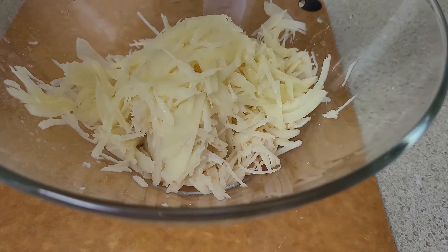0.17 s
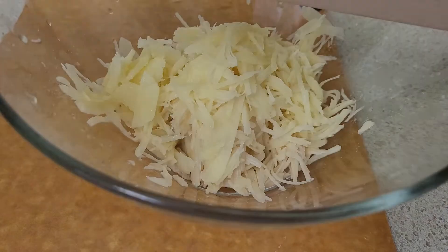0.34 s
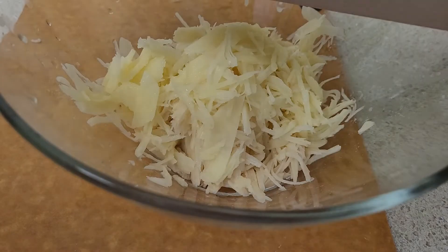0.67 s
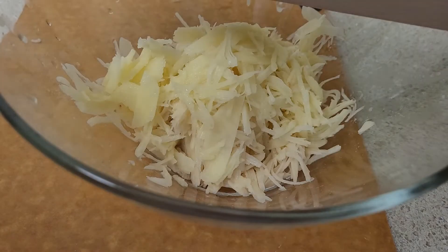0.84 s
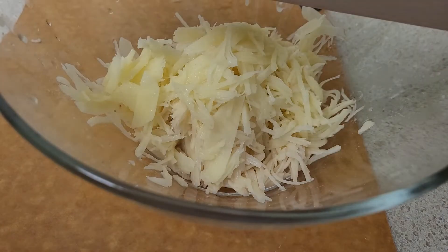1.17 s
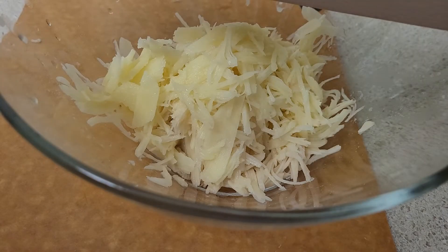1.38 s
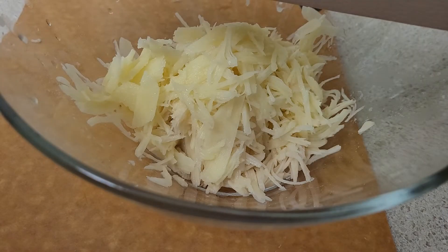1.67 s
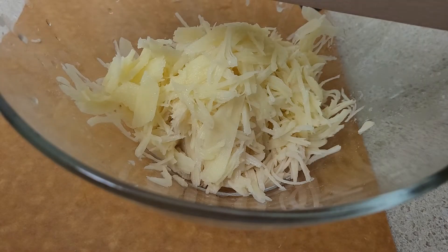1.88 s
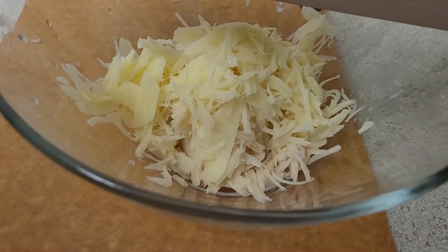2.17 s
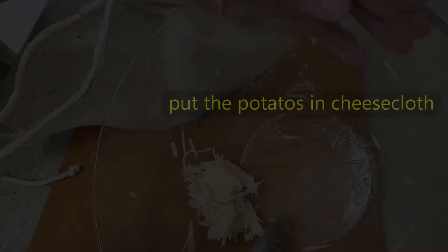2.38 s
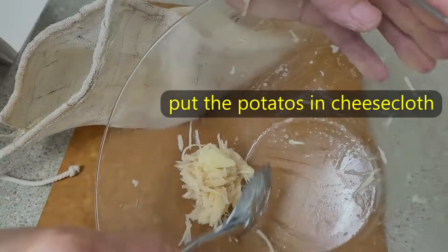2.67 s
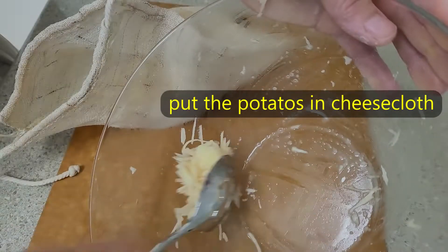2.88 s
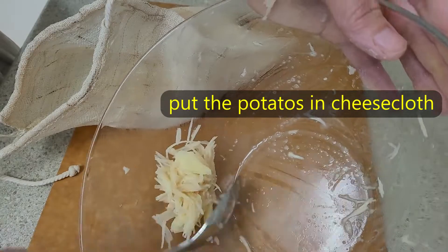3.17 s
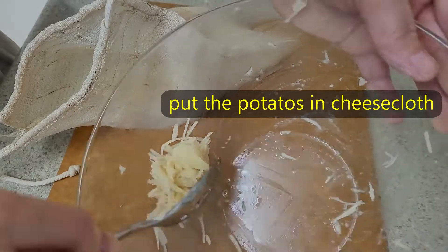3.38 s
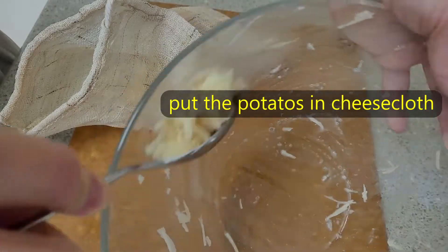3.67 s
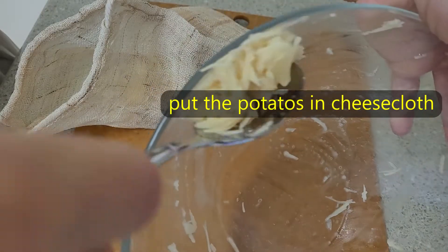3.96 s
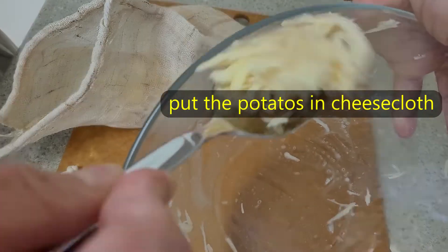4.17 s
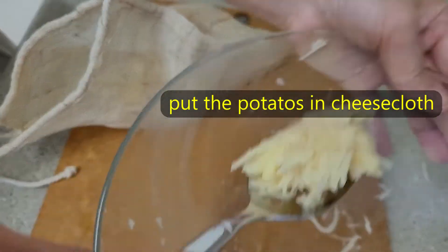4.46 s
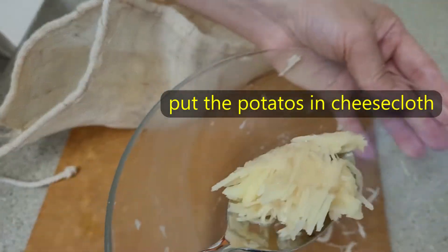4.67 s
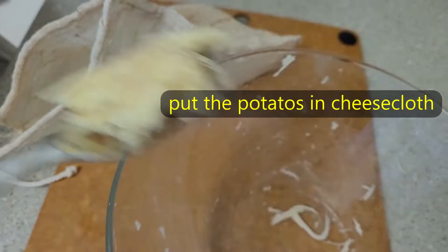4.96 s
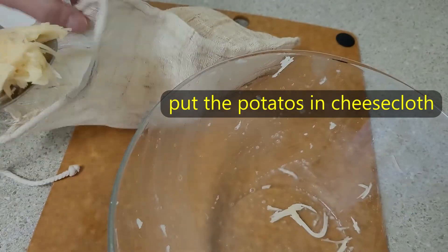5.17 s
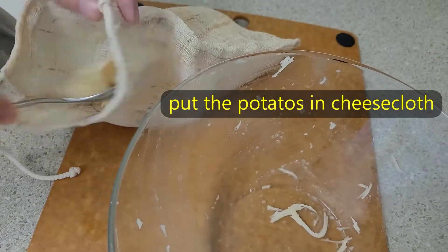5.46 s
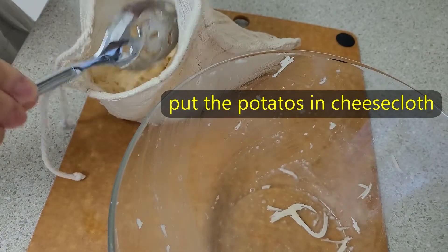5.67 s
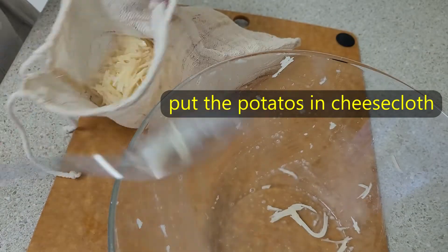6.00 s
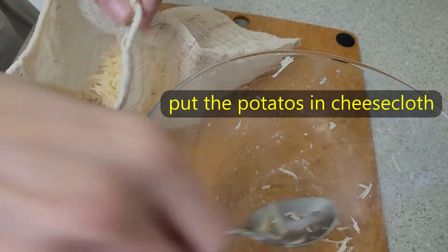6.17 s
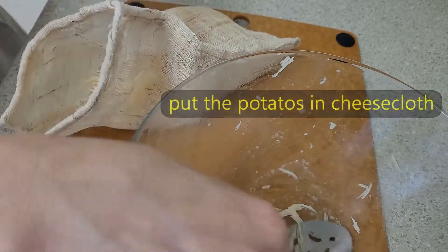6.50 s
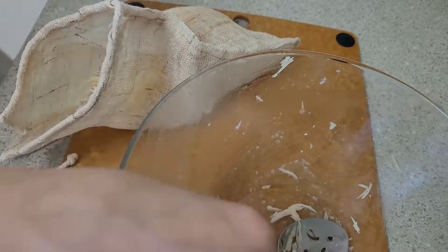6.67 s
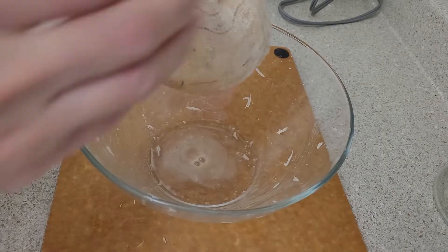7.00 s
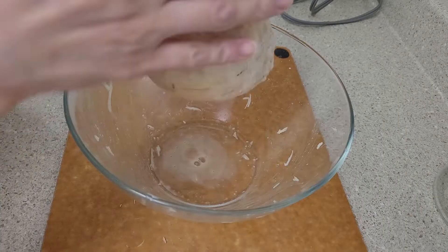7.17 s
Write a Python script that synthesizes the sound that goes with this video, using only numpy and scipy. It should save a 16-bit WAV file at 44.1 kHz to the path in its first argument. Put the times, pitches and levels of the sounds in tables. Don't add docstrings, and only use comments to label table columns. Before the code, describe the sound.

Quick wet shredding rasps stop abruptly, near quiet follows, then a spoon taps glass, a bowl thuds down, wet fizz and metal clatter.

```python
import sys
import numpy as np
from scipy import signal
from scipy.fft import rfft, irfft
from scipy.io import wavfile
from scipy.ndimage import uniform_filter1d

SR = 44100
rng = np.random.default_rng(int(sys.argv[2]) if len(sys.argv) > 2 else 0)


def to_wav(sig):
    pcm = np.clip(np.atleast_2d(sig), -1, 1) * 32767
    pcm = np.round(pcm).astype(np.int16)
    wavfile.write(sys.argv[1], SR, pcm.T)


def invert_db(level):
    return 10 ** (np.asarray(level, dtype=float) / 20)


N = 323694
TIME = np.arange(N) / SR

CUTS_S = [
    .302,
    2.168,
    2.302,
    6.72,
]

# centre in seconds, peak level in dB, length in seconds.
STROKES = [
    (.004, -29, 0.033),
    (0.05, -29.5, 0.031),
    (.095, -23, 0.034),
    (0.148, -27.5, 0.028),
    (0.18, -31.5, 0.019),
    (0.193, -23, 0.031),
    (0.207, -24.5, 0.025),
    (0.222, -24, 0.03),
    (0.272, -27, 0.032),
]
# frequency in Hz, density in dB per Hz.
BLADE_COLOUR = [(180, -64.5), (300, -29.5), (398, -20.5), (439, -25.5), (633, -0.5), (747, -18.5),
                (1170, -11), (2160, -8), (3160, -5), (7600, -12.5), (12500, -10.5), (15800, -17.5)]
# frequency in Hz, level in dB.
SLICER_ECHO = [(3500, 3), (5500, -25)]
SLICER_WET = 0.61

# frequency in Hz, density in dB per Hz.
STILL_AIR = [(15, -54.5), (25, -26), (82, -5), (189, -14), (228, -1), (276, -19), (352, -5), (486, -13.5),
             (636, -17), (1350, -24.5), (1920, -31.5), (2090, -41.5), (2260, -22), (2730, -33),
             (15800, -52.5)]
BUSY_AIR = [(15, -41.5), (25, 1), (165, -9), (228, 0.5), (342, -4.5), (556, -1.5), (1150, -16.5),
            (1320, -14.5), (1640, -27), (2320, -21), (3580, -29), (6300, -36), (15800, -59.5)]
LAST_AIR = [(15, -36), (25, -10.5), (59, -5.5), (152, -7), (228, 4.5), (316, -8), (371, 0.5), (748, 2),
            (1010, -9), (1870, -12.5), (4090, -26), (10200, -36), (15800, -69)]
STILL_DB, BUSY_DB, LAST_DB = -56, -49, -49.5
# frequency in Hz, width in Hz, level in dB.
FAN_BANDS = [(1926, 59, -3), (2280, 110, -7), (8640, 64, -16)]
# frequency in Hz, difference in dB.
PORTS_DB = [(60, -5.5), (110, -2), (200, -7.5), (380, 2.5), (700, -1), (1290, 0), (2380, 0.5), (4400, -2),
            (8120, -0.5), (15000, 0.5)]
ROOM_T60_S, ROOM_TOP_T60_S, ROOM_DB = 0.27, 0.2, -19

# start in seconds, then crack, bowl, neck and rim levels in dB.
TAPS = [
    (2.6678, -8, -2.5, -16.5, -26),
    (2.7573, -12.5, -13.5, 1.5, -21),
    (2.79, -30, -1, -5, -9.5),
    (2.829, -31, -5.5, -14, -5),
    (2.8466, -6.5, -10.5, -30.5, -26),
    (3.1242, -9, -6, -12, -17.5),
    (3.164, -31, -7, -3.5, -6.5),
    (3.189, -2.5, -4.5, -8.5, -14.5),
    (3.4629, -14.5, -2, -32.5, -36),
]
# start in seconds, level in dB.
CHIMES = [
    (2.302, -57.5),
    (2.418, -65.5),
    (2.456, -50),
]
CHIME_MODE = (3982, 0, 0.37)
# frequency in Hz, level in dB, 60 dB decay in seconds.
BOWL = [(600, -11, 0.09), (1200, -16.5, .07), (1223, -15, 0.21), (1333, -12, 0.15), (1478, -13, 0.11),
        (1720, -26, .15), (2430, -4.5, 0.08), (2930, -11.5, 0.32), (3290, -7, 0.098)]
NECK = [(3940, -23, 0.3), (4090, 8.5, 0.26)]
RIM = [(5340, -18, 0.15), (6510, 1, .22), (7154, -15, 0.12), (8370, -14, .15), (8852, -24, .12),
       (10280, -14.5, .17), (11440, -21, 0.15), (12100, -25, .12), (12935, -20, 0.13), (13350, -23.5, 0.11)]
# frequency in Hz, density in dB per Hz.
CRACK_COLOUR = [(120, -29), (200, -24), (802, -2.5), (1470, 0), (2490, -29.5), (2830, -4.5), (6560, -15.5),
                (15800, -54)]
CLATTER_COLOUR = [(180, -51), (300, -31.5), (1680, -7.5), (2340, -9), (4400, -12), (4620, -9.5),
                  (6340, -10.5), (15800, -16.5)]
REGRIP_S, GRIP_HZ = 3., (4010, 3979)
GRIP_RING = (0.81, 0.87)
TOUCH_DAMPS_DB_S = 900

# start in seconds, peak level in dB, upper modes in dB.
THUDS = [(1.011, -61, 14), (2.454, -45.5, 7.5), (2.667, -29, 5.5), (2.758, -36.5, 13.5), (2.845, -23.5, -1),
         (3.123, -34, 8), (3.188, -23, 6), (4.7222, -2, -4.5), (4.978, -49, 6), (5.045, -37, -9),
         (5.878, -40, -13), (5.919, -62, -15), (6.392, -26, -5.5), (6.552, -25.5, -0.5)]
# frequency in Hz, level in dB, 60 dB decay in seconds.
BOARD = [(55.4, -12, 0.35), (93.2, -11, 0.33), (118.9, -4, 0.23), (207.2, -18.5, .2), (331.3, -5, 0.26)]
FOOT = [(322.4, -2.5, 0.052), (475.6, -8.5, 0.023), (630.4, 7, 0.063), (727, -3, 0.066), (1212, -8.5, 0.17),
        (1735, -15.5, 0.015), (2130, -24, 0.069), (3340, -20, 0.038)]
SET_DOWN = [(187.3, -6, 0.18), (341, -5.5, 0.14), (409.5, -4, 0.13), (538, -8, 0.16), (752, -14, 0.16),
            (1058, -16, 0.105), (1178, -6.5, 0.077), (1434, -17.5, .12), (1733, -10.5, 0.057),
            (2150, -17.5, .07), (2560, -26, .07), (3302, -24, .05)]
HUM_S, HUM_MODE = 4.735, (426, -30.5, 1.02)

# start in seconds, peak level in dB, rattle decay in seconds,
# landing end (0 handle, 1 scoop), clatter level in dB.
DROPS = [
    (6.3881, -6.5, 0.0028, 0, -6.5),
    (6.3966, -3.5, 0.0056, 0, -10.5),
    (6.4033, -12.5, 0.0055, 0, -8.5),
    (6.4342, -29.5, 0.015, 1, -4),
    (6.5452, -16, .0062, 1, -3),
    (6.5522, 5, 0.017, 1, -4.5),
    (6.5634, -2, 0.023, 1, -3.5),
    (6.5785, -8, .021, 1, -8.5),
    (6.6145, -20, 0.076, 1, -2),
]
# frequency in Hz, level in dB, 60 dB decay in seconds.
HANDLE = [(394, -18, .2), (549, -24, .2), (1276, -14, .13), (2310, -16, .07), (3235, -10, .09),
          (3652, -20, .05), (4030, -14, .1), (5490, -13, .11), (6175, -12, .1), (7030, -21, .1),
          (8680, -4, .09), (8893, -1, .1), (9240, -13, .075), (10335, -13, .07), (11255, -13, .08),
          (12095, -14, .09), (13115, -11, .07), (15310, -13, .055)]
SCOOP = [(1502, -20, .1), (2322, -4, .14), (3258, -11, .26), (4002, -13, .1), (4324, -11, .28),
         (5165, -19, .13), (5549, -15, .3), (6218, -5, .13), (6526, -14, .22), (6840, -12, .22),
         (7470, -13, .2), (8177, -11, .22), (8893, -10, .2), (9275, -8, .12), (10124, -13, .23),
         (10562, -21, .14), (11082, -21, .22), (11742, -17, .16), (12072, -17, .2), (12567, -14, .15),
         (12902, -16, .14), (13471, -14, .16), (14002, -18, .1), (15305, -17, .09)]

# time in seconds, level in dB.
DRAG = [(2.3, -50.5), (2.73, -62.5), (2.85, -53.5), (3.18, -58), (3.35, -47.5), (3.88, -50.5), (4.12, -58),
        (4.4, -49.5), (5.12, -56), (6.22, -60), (7.34, -58)]
# frequency in Hz, density in dB per Hz.
SHREDS_COLOUR = [(590, -21), (1000, -0.5), (1120, -6.5), (1350, 3.5), (1550, -2), (2240, -4), (2890, -6.5),
                 (3400, -2.5), (4430, -5), (12700, -2), (15800, -9.5)]
FIZZ_FULL_S, FIZZ_DB, FIZZ_RISE_DB_S = 4.665, -52, 99.5
FIZZ_DRAINS_S, FIZZ_DRAIN_DB_S, FIZZ_ENDS_S, FIZZ_END_DB_S = 5.44, 8, 6.55, 121

HAUL_S, HAUL_RISE_S, HAUL_FALL_S, HAUL_DB = 4.385, 0.091, 0.15, -31.5
SLIP_HZ, SLIP_WOBBLE, SLIP_PATCHY_DB = 108, .03, 4
HAUL_PAUSE_S = 4.44
SLIP_ORDERS_DB = [3, -8, -8, -14.5, -25]
HAUL_HISS_S, HAUL_HISS_DB, HAUL_HISS_HZ = (4.35, 4.57), -46, 1560

# start in seconds, peak level in dB, decay in seconds.
TICKS = [
    (1.468, -43, 0.0068),
    (2.4155, -48.5, 0.0038),
    (3.464, -23.5, 0.018),
    (3.797, -51, 0.0065),
    (4.723, -26, 0.0576),
    (5.177, -34.5, 0.066),
    (6.829, -52, 0.0058),
    (7.01, -49, .005),
]
# centre in seconds, peak level in dB, length in seconds,
# centre frequency in Hz.
BRUSHES = [(.477, -64, .05, 2700), (.783, -56, .07, 2500), (.821, -49, .04, 2200), (1.021, -44, .026, 437),
           (1.304, -58, .023, 3250), (1.416, -56, .05, 1650), (1.602, -61, .024, 2200),
           (1.471, -47.5, .014, 2400), (4.215, -50.5, .065, 1950), (5.254, -43.5, .085, 9500),
           (5.191, -41, .04, 10600), (.985, -62, .05, 3000), (4.601, -58.5, .081, 1520),
           (6.201, -53.5, .05, 10100), (7.271, -62.5, .121, 11100)]
SLUMPS = [
    (4.991, -49, .061, 1460),
    (5.188, -43, .04, 4100),
    (5.246, -43.5, .065, 1350),
    (6.15, -55, .055, 1490),
]
SCRAPES = [(2.456, -63, .044, 8110), (2.663, -50, .012, 2410), (2.843, -46.5, .009, 3020),
           (3.122, -50, .007, 3010), (3.186, -38.5, .01, 3110), (3.264, -53, .025, 9500),
           (3.586, -66.5, .021, 8510), (3.627, -66.5, .016, 8000), (3.673, -66, .012, 9500),
           (3.723, -64, .041, 7010), (3.812, -56, .041, 3810), (3.927, -69, .03, 9000),
           (4.181, -49, .046, 2410), (6.385, -49, .011, 4310), (6.548, -33, .025, 7500)]
SINGS = [
    (4.176, -55, .034, 1336),
    (4.392, -70, .111, 6550),
]
HOLLOWS = [(2.474, -46, .017, 601), (2.832, -45, .015, 1352), (3.216, -43, .041, 1402),
           (6.621, -39.5, .036, 3258), (6.448, -53, .041, 6172), (6.399, -20, .016, 615),
           (6.402, -30, .026, 1350), (6.414, -26, .058, 120), (6.579, -21, .064, 123.5)]
DRIPS = [(6.765, -56, .034, 785), (6.836, -50, .024, 726), (6.835, -57.5, .021, 1221),
         (6.835, -63, .021, 2331), (6.871, -62, .057, 1881), (7.017, -53, .035, 771),
         (7.031, -62, .045, 1901), (7.089, -52, .038, 787), (7.196, -51, .036, 767),
         (7.19, -59, .041, 1941), (7.226, -54, .035, 706), (7.289, -51.5, .06, 800)]
SQUEAKS = [
    (5.183, -40, .02, 12850),
    (5.241, -38.5, .019, 12650),
    (5.266, -48, .035, 12450),
    (4.179, -54, .044, 5590),
    (4.176, -51, .041, 4435),
    (4.506, -53.5, .121, 2165),
    (4.214, -49, .042, 1950),
    (4.701, -53.5, .046, 4385),
]
# table of rubs, spread in octaves, spoon ring in dB.
RUBS = [(BRUSHES, 0.77, -40), (SLUMPS, 1.4, -40), (SCRAPES, 1.2, 11), (SINGS, 0.05, 10), (HOLLOWS, 0.15, -8.5),
        (DRIPS, 0.098, -30), (SQUEAKS, 0.06, -32)]
# start in seconds, peak level in dB, frequency in Hz, 60 dB decay in seconds.
PINGS = [(2.339, -56, 6550, 0.065), (2.416, -38, 600, .04), (2.416, -60, 8600, 0.091),
         (2.4555, -33.5, 580, 0.031), (2.497, -56.5, 2350, 0.028), (2.6686, -12.5, 616, 0.036),
         (2.6685, -13.5, 1230, .014), (2.6692, -22.5, 2415, 0.043), (2.6714, -15.5, 4080, 0.072),
         (2.8466, -17.5, 1320, 0.022), (2.8463, -17.5, 606, 0.053), (2.8454, -28, 2440, 0.043),
         (2.913, -42.5, 2440, .06), (3.1242, -13.5, 622, .065), (3.1243, -15.5, 1280, 0.016),
         (3.1227, -25.5, 2600, 0.022), (3.1887, -5, 1400, 0.015), (3.1891, -18, 627, 0.061),
         (3.4638, -18.5, 1490, 0.018), (3.464, -29, 2740, .04), (3.4635, -37, 3210, 0.066),
         (3.4643, -45.5, 5421, 0.11), (3.4637, -44, 6270, 0.044), (3.557, -50, 8350, .05),
         (3.557, -55, 7200, .05), (3.62, -50.5, 7200, .09), (3.62, -54, 6550, .06), (3.62, -52, 9200, .04),
         (3.667, -52, 9500, .03), (3.714, -53, 7000, .06), (3.714, -55, 3800, 0.082),
         (3.7985, -48, 2230, .05), (3.7983, -45, 3210, .06), (3.7975, -46, 3810, .1),
         (3.7985, -53, 5437, .09), (3.7985, -50, 6740, .08), (3.7985, -54, 8764, 0.054),
         (3.831, -54, 6520, .06), (3.831, -57, 7500, .07), (4.7225, -8, 627, 0.063),
         (4.723, -38, 3320, 0.035), (.707, -56, 2560, 0.057), (.808, -46, 2950, .05),
         (.853, -52, 2600, 0.043), (.93, -61, 3950, .06), (1.466, -46.5, 1930, .04), (6.829, -39, 720, .06),
         (5.176, -43, 12900, .04), (6.3882, -12.5, 606, 0.062), (6.3882, -19.5, 1344, .07)]
PING_APART = 1.45


def on_log(table, hz):
    f, v = np.transpose(table)
    return np.interp(np.log(np.maximum(hz, 1)), np.log(np.maximum(f, 1)), v)


def unit(x):
    return x / np.sqrt(np.mean(x ** 2))


def colour(x, table):
    n = x.shape[-1]
    return irfft(rfft(x) * invert_db(on_log(table, np.fft.rfftfreq(n, 1 / SR))), n)


def band(hz, octaves):
    hump = ((-5.0, -38.5), (-.5, -2.0), (-0.2, 0.5), (0.38, -3.5), (3.0, -45.0))
    return [(hz * 2 ** (k * octaves), db) for k, db in hump]


def walk(rate):
    k = int(SR / rate)
    steps = np.repeat(rng.standard_normal(N // k + 1), k)
    return uniform_filter1d(uniform_filter1d(steps, k), k)[:N]


def pair(n, like, lag_ms, grain_db):
    grains = invert_db(grain_db * np.minimum(rng.exponential(size=n), 4))
    shared, left, right = rng.standard_normal((3, n)) * grains
    hz = np.fft.rfftfreq(n, 1 / SR)
    own = np.sqrt(1 - np.clip(like, 0, .99)) * np.clip(hz / 300, 0, 1) ** 2
    late = np.exp(-2j * np.pi * hz * lag_ms / 1000)
    common = np.sqrt(1 - own ** 2) * rfft(shared)
    return irfft([common * late + own * rfft(left), common + own * rfft(right)], n)


def add(out, x, s):
    a = int(round(s * SR))
    x = x[:, max(-a, 0):N - a]
    out[:, max(a, 0):max(a, 0) + x.shape[1]] += x


def bump(length_s):
    return np.hanning(int(length_s * 1.4 * SR) + 3) ** 2


def ring(modes, scatter_db, rough, early_db, shift=1.):
    hz, db, t60 = np.transpose(modes)[:, :, None]
    chance = rng.standard_normal((2, len(hz), 1))
    t = np.arange(16384) / SR
    decay = invert_db(-60 * t / np.clip(t60, .01, 1.3)) * (1 + invert_db(early_db) * invert_db(-60 * t / 0.072))
    jitter = np.repeat(rng.standard_normal((2, len(hz), 128)), 128, axis=2)
    jitter = uniform_filter1d(jitter, size=128)
    size = invert_db(db + scatter_db * chance[0] + 10.9 * rough * jitter[0]) * decay * (1 - np.exp(-t / 0.0014))
    phase = 2 * np.pi * hz * shift * t + 2.57 * rough * jitter[1]
    apart = (1.5 + .35 * chance[1]) * np.clip(hz / 300, 0, 1) ** 2
    return np.array([(size * np.sin(phase + side * apart)).sum(0) for side in (-.5, .5)])


def crack(decay_s, table):
    t = np.arange(8192) / SR
    x = colour(pair(8192, 0.5, .3, 0.73), table) * np.exp(-t / decay_s) * (1 - np.exp(-t / 0.00027))
    return x / np.abs(x).max()


def slicer():
    out = np.zeros((2, N))
    for s, db, length_s in STROKES:
        shape = bump(length_s)
        grip = np.transpose([np.geomspace(400, 15000, 48), 2.5 * rng.standard_normal(48)])
        torn = colour(pair(8192, 0.24, 0.66, 0.5), BLADE_COLOUR)
        fibres = unit(colour(torn, grip))
        add(out, invert_db(db) * fibres[:, :len(shape)] * shape, s - len(shape) / 2 / SR)
    return out


def room(x):
    t = np.arange(SR // 2) / SR
    low, top = rng.standard_normal((2, 2, len(t)))
    top = top - uniform_filter1d(top, size=9)
    low = uniform_filter1d(low, size=9) * 3
    tail = low * invert_db(-60 * t / ROOM_T60_S) + top * invert_db(-60 * t / ROOM_TOP_T60_S)
    tail = colour(tail, [(80, -31.5), (250, -1.5), (16000, -5)])
    tail = tail / np.sqrt((tail ** 2).sum(1, keepdims=True))
    return x + invert_db(ROOM_DB) * signal.fftconvolve(x, tail, axes=1)[:, :N]


def air(table, db):
    fan = np.zeros((2, N))
    for hz, width, line_db in FAN_BANDS:
        line = [(hz - 3 * width, -40), (hz - width / 2, -3), (hz + width / 2, -3), (hz + 3 * width, -40)]
        fan += invert_db(line_db) * unit(colour(pair(N, 0.25, 0.33, 0), line))
    tone = unit(colour(pair(N, 0.29, .5, 0.41), table)) * invert_db(.8 * walk(14))
    return invert_db(db) * (tone + invert_db(-14.5 + 3.4 * walk(4.9)) * fan)


def rubs():
    out = np.zeros((2, N))
    for s, db, decay_s in TICKS:
        add(out, invert_db(db) * crack(decay_s, band(1396, 1.54)), s)
    hollow = [(230, -10.5, .2), (436.5, -9.0, 0.1022)]
    modes = np.array(BOARD + hollow + BOWL + NECK[-1:] + RIM + SCOOP)
    glass = ring(np.minimum(modes * [1, .4, 1], [SR, 0, .13]), 1.5, .3, 0)
    for rows, octaves, ring_db in RUBS:
        for s, db, length_s, hz in rows:
            shape = bump(length_s)
            start_s = s - len(shape) / 2 / SR
            slide = unit(colour(pair(8192, 0.38, .4, 0.94), band(hz, octaves)))[:, :len(shape)] * shape
            sing = signal.fftconvolve(glass, slide[:1], axes=1)
            add(out, invert_db(db) * slide, start_s)
            add(out, invert_db(db + ring_db + 5.5) * sing / np.abs(sing).max(), start_s)
    return out


def pings():
    out = np.zeros((2, N))
    t = np.arange(8192) / SR
    for s, db, hz, t60 in PINGS:
        phase = 2 * np.pi * hz * t + PING_APART * np.array([[-.5], [.5]])
        size = invert_db(db - 60 * t / max(t60, .004)) * (1 - np.exp(-t / 0.00018))
        add(out, size * np.sin(phase), s)
    return out


def thuds():
    out = np.zeros((2, N))
    for s, db, upper_db in THUDS:
        upper = SET_DOWN if abs(s - HUM_S) < .05 else FOOT
        for modes, push_s, rough, size_db in ((BOARD, .005, .15, db - 4.0),
                                              (upper, .0003, .35, db + upper_db - 8.5)):
            push = bump(push_s)
            body = ring(modes, 0.58, rough, 4.3)
            pushed = signal.fftconvolve(body, push[None] / push.sum(), axes=1)
            add(out, invert_db(size_db) * pushed, s + push_s / 2)
    add(out, ring([HUM_MODE], 0, 0.098, -19), HUM_S)
    return signal.sosfilt(signal.butter(3, 48, "high", fs=SR, output="sos"), out)


def taps():
    out = np.zeros((2, N))
    for s, db in CHIMES:
        add(out, invert_db(db) * ring([CHIME_MODE], 0, 0.12, -14), s)
    next_touches = [row[0] for row in TAPS[1:]] + [N / SR]
    for (s, db, bowl_db, neck_db, rim_db), next_s in zip(TAPS, next_touches):
        contact = invert_db(db) * crack(0.0017, CRACK_COLOUR)
        scuff = invert_db(db - 27.5) * crack(0.038, band(2300, 1.5))
        add(out, contact + scuff, s)
        add(out, invert_db(db + bowl_db - 28.5) * ring(BOWL, 2.5, 0.91, 6.7), s)
        grip = int(s > REGRIP_S)
        held = [1, 1, GRIP_RING[grip]]
        free = invert_db(-TOUCH_DAMPS_DB_S * np.maximum(np.arange(16384) / SR + s - next_s, 0))
        neck = ring(np.multiply(NECK, held), 1, .18, 1, GRIP_HZ[grip] / NECK[-1][0])
        rim = ring(np.multiply(RIM, held), 3.4, 0.26, 5.3)
        add(out, invert_db(db + neck_db - 13.5) * free * neck, s)
        add(out, invert_db(db + rim_db - 4.0) * free * rim, s)
    return out


def drag():
    s, db = np.transpose(DRAG)
    rumble = [(20, -22.5), (45, -7.5), (70, -4.0), (110, 1.0), (140, -7.0), (200, -46.0)]
    low = unit(colour(pair(N, 0.7, 0.52, 0), rumble))
    return invert_db(np.interp(TIME, s, db, left=-120) + 1 + 4.66 * walk(25)) * low


def fizz():
    rise_db = FIZZ_RISE_DB_S * np.maximum(FIZZ_FULL_S - TIME, 0)
    drain_db = FIZZ_DRAIN_DB_S * np.maximum(TIME - FIZZ_DRAINS_S, 0)
    end_db = FIZZ_END_DB_S * np.maximum(TIME - FIZZ_ENDS_S, 0)
    flicker_db = .6 * walk(30)
    films = unit(colour(pair(N, 0.35, 0.34, 1.4), SHREDS_COLOUR))
    return films * invert_db(FIZZ_DB - rise_db - drain_db - end_db + 5.5 + flicker_db)


def haul():
    push = np.exp(-((TIME - HAUL_S) / np.where(TIME < HAUL_S, HAUL_RISE_S, HAUL_FALL_S)) ** 2)
    phase = 2 * np.pi * np.cumsum(SLIP_HZ * (1 + SLIP_WOBBLE * walk(40))) / SR
    slip = np.zeros(N)
    for k, db in enumerate(SLIP_ORDERS_DB):
        size = invert_db(db + SLIP_PATCHY_DB * walk(35)) * push ** (1 + 0.28 * k)
        slip += size * np.sin((k + 1) * phase + 1.7 * walk(60))
    moving = uniform_filter1d(1. * (TIME > HAUL_HISS_S[0]) * (TIME < HAUL_HISS_S[1]), size=2500)
    moving = moving * (1 - 0.62 * np.exp(-((TIME - HAUL_PAUSE_S) / 0.014) ** 2))
    hiss = unit(colour(pair(N, 0.27, .4, 2.5), band(HAUL_HISS_HZ, 1.7))) * invert_db(HAUL_HISS_DB + walk(40))
    return invert_db(HAUL_DB) * slip + moving * hiss


def drops():
    out = np.zeros((2, N))
    for s, db, rattle_s, end, clatter_db in DROPS:
        spoon = ring((HANDLE, SCOOP)[int(round(end))], 1, .2, 3)
        add(out, invert_db(db) * spoon / np.abs(spoon).max(), s)
        add(out, invert_db(db + clatter_db - 2.5) * crack(rattle_s, CLATTER_COLOUR), s)
    return out


def scene():
    sliced, hushed, busy, dripping = [uniform_filter1d(1. * (TIME > s), size=130) for s in CUTS_S]
    slides = rubs() + pings()
    last = slides * dripping
    handled = room(taps() + thuds() + drops() + haul() + slides - last) + fizz()
    strokes = slicer()
    dull = colour(strokes, SLICER_ECHO)
    echo = room(dull) - dull
    out = (strokes + SLICER_WET * echo) * (1 - sliced) + air(STILL_AIR, STILL_DB) * (1 - hushed)
    kitchen = handled + air(BUSY_AIR, BUSY_DB - 2.5) * busy
    out += kitchen * (1 - dripping) * (1 - hushed + busy)
    return out + drag() * busy + last + air(LAST_AIR, LAST_DB - 2.5) * dripping


def top_cut(x):
    return signal.sosfilt(signal.butter(12, 15920, fs=SR, output="sos"), x)


def record(dry):
    tilt = on_log(PORTS_DB, np.fft.rfftfreq(N, 1 / SR)) / 2
    heard = irfft(rfft(dry) * invert_db(np.array([tilt, -tilt])), N)
    silence = (TIME > CUTS_S[1] + .004) & (TIME < CUTS_S[2] - .002)
    mix = np.clip(heard * ~silence, -1, 1)
    return top_cut(mix)


dry = scene()
out = record(dry)
to_wav(out)
```